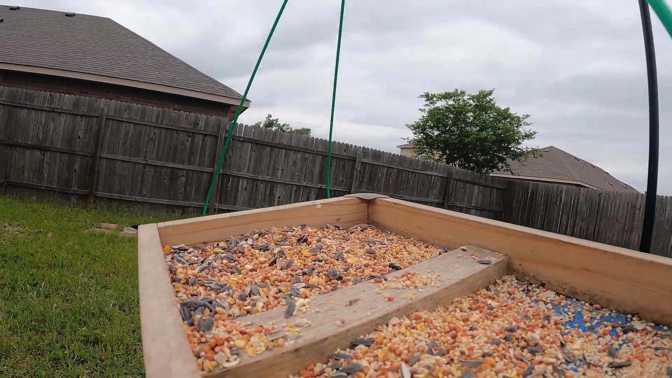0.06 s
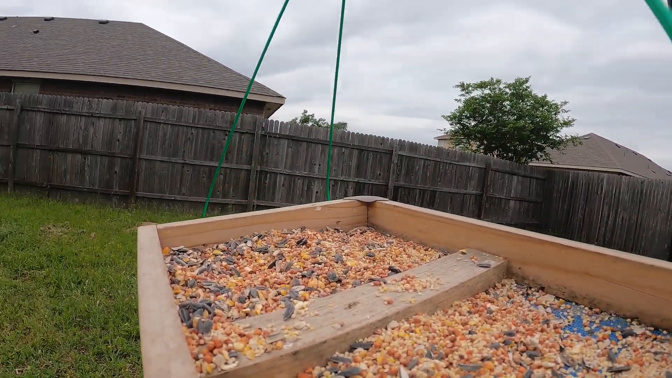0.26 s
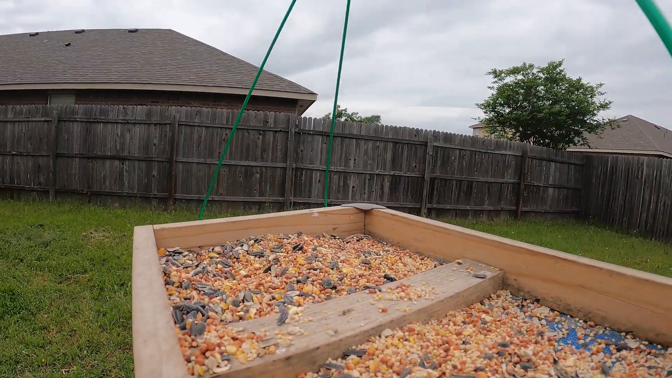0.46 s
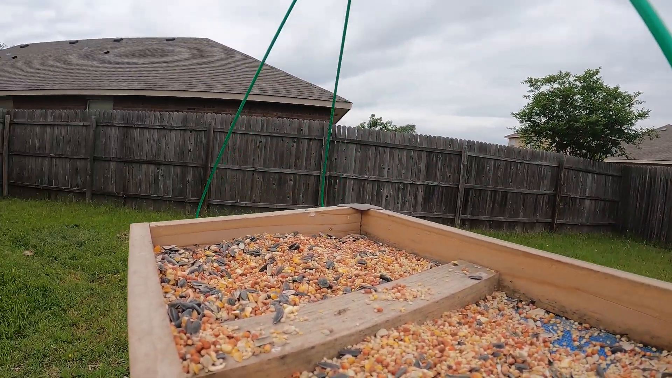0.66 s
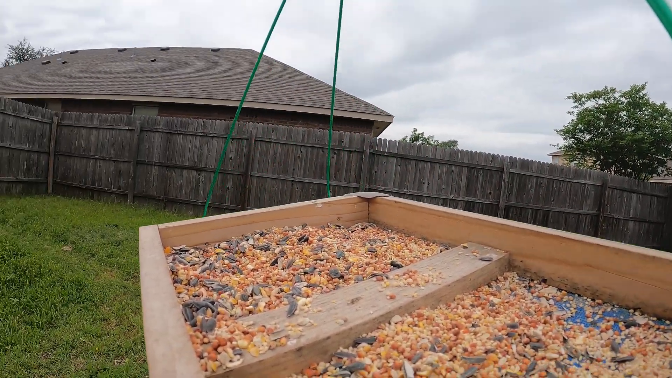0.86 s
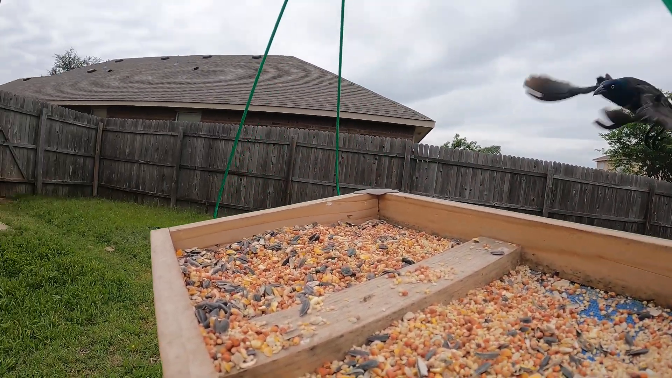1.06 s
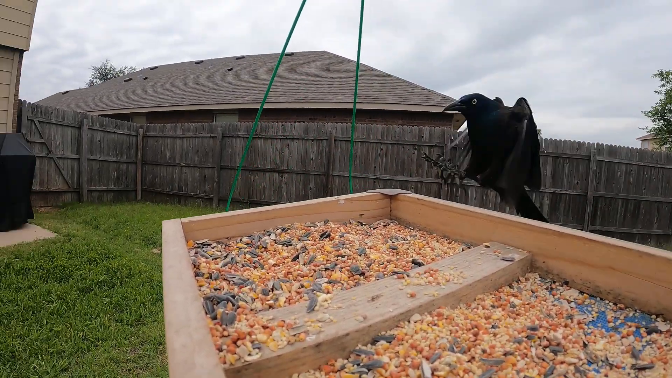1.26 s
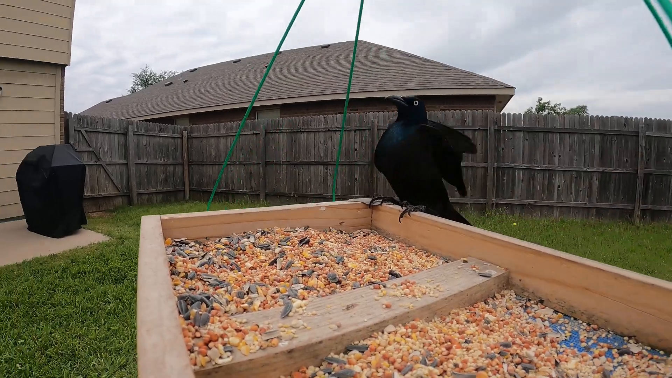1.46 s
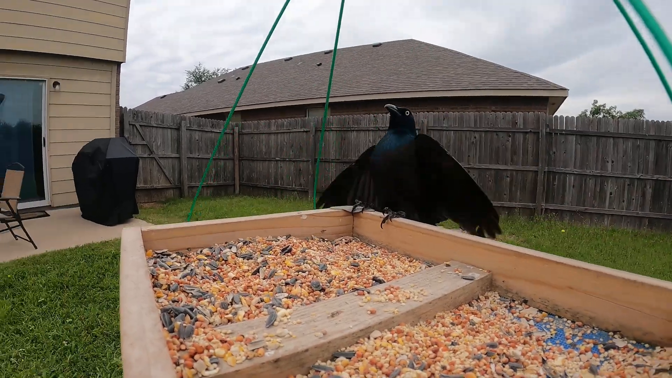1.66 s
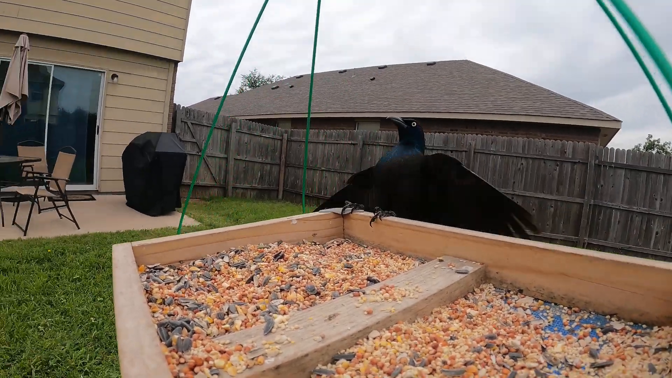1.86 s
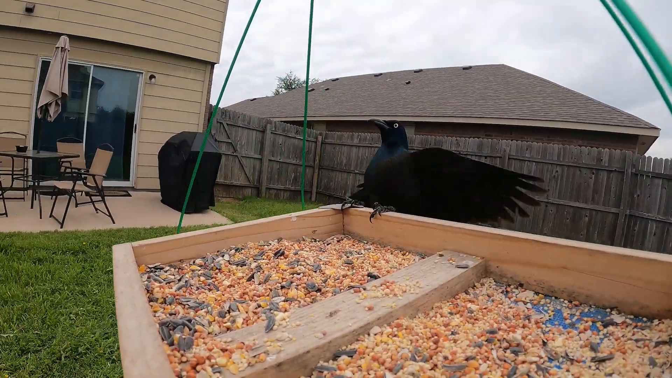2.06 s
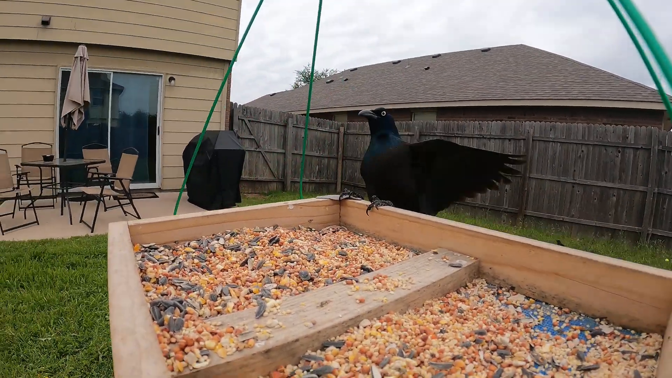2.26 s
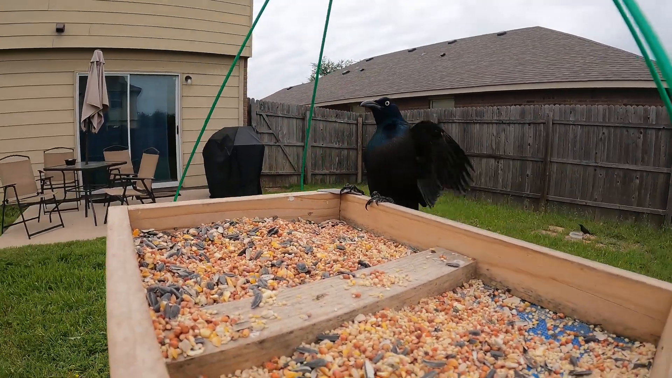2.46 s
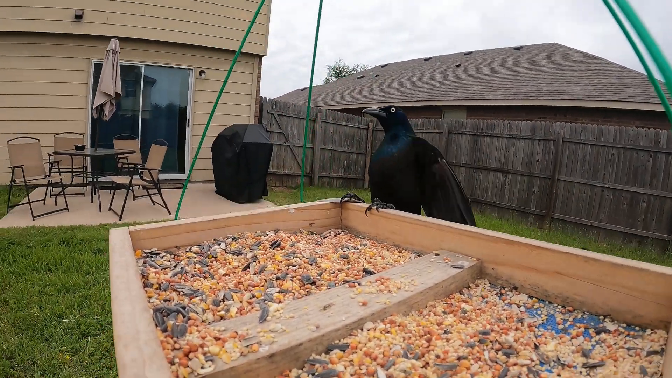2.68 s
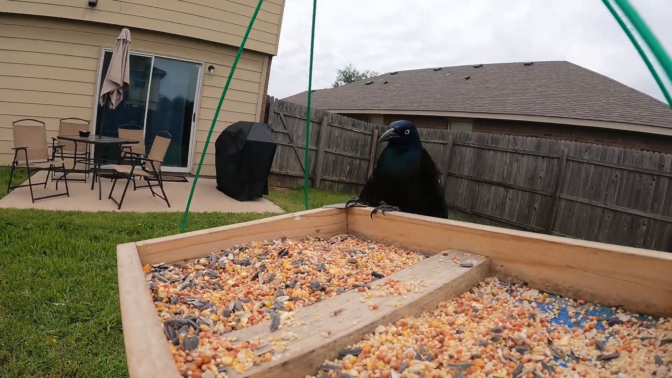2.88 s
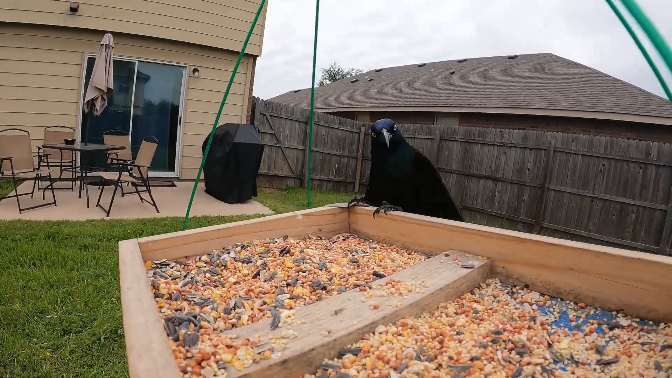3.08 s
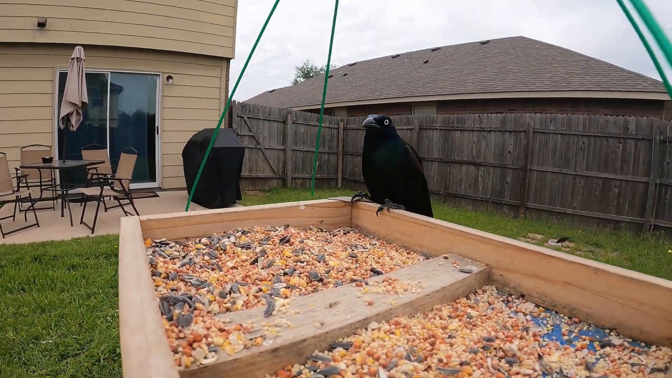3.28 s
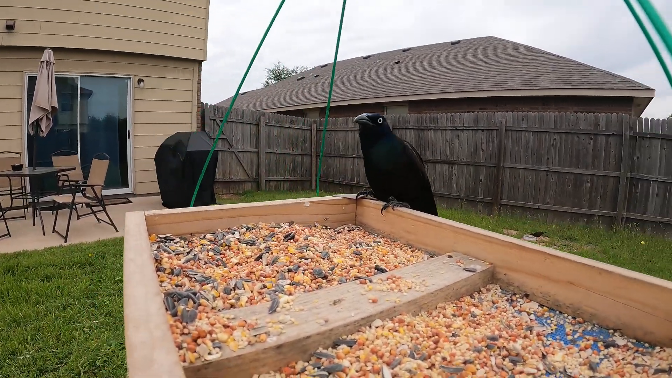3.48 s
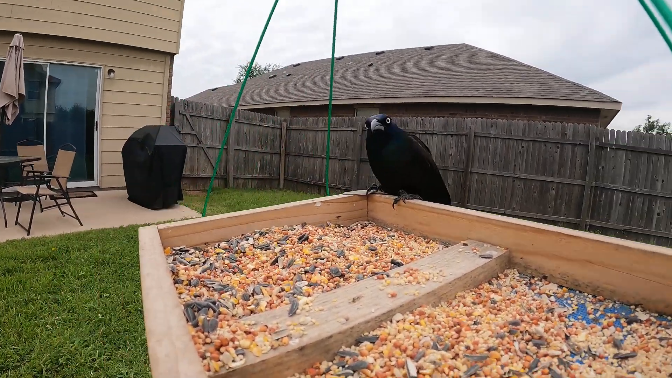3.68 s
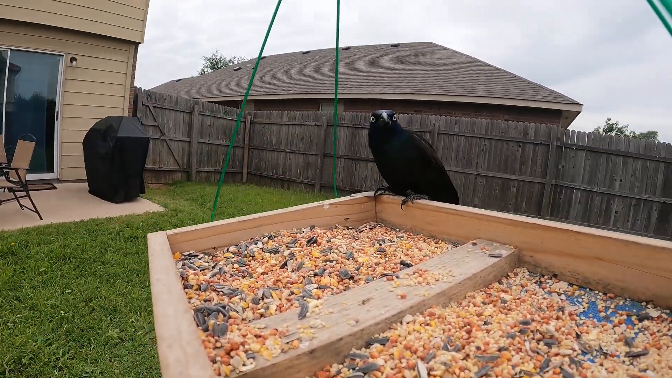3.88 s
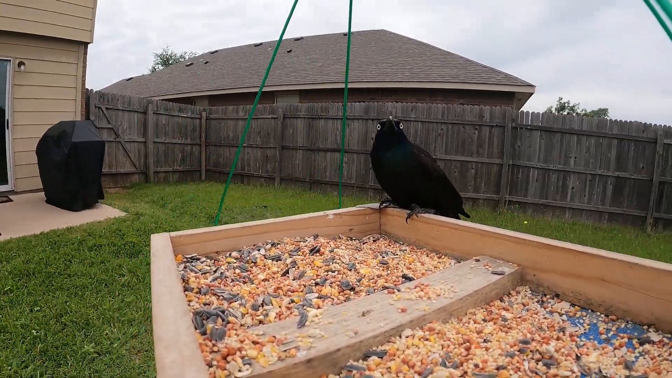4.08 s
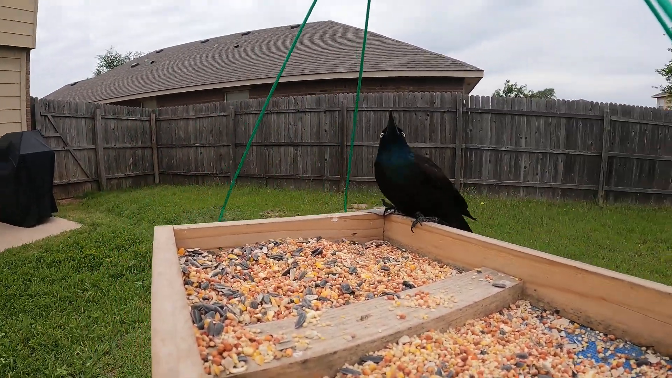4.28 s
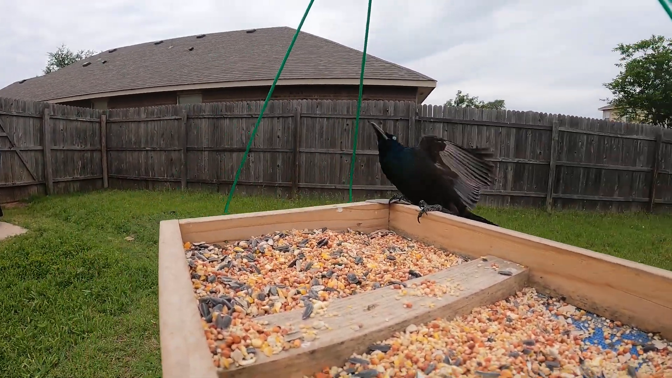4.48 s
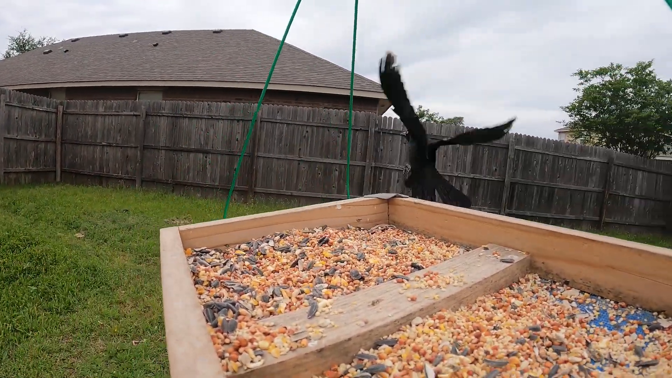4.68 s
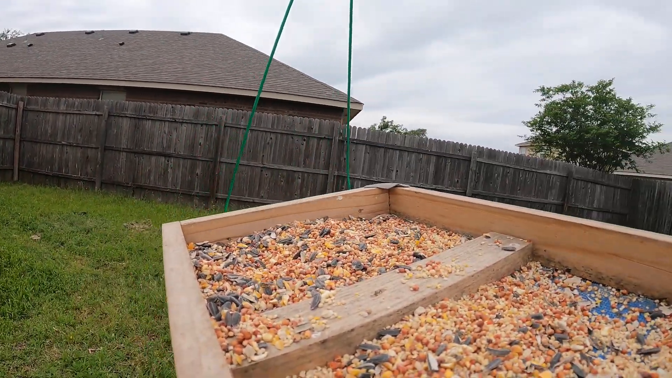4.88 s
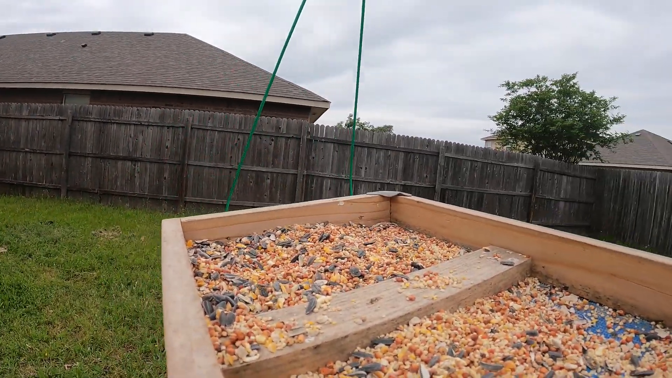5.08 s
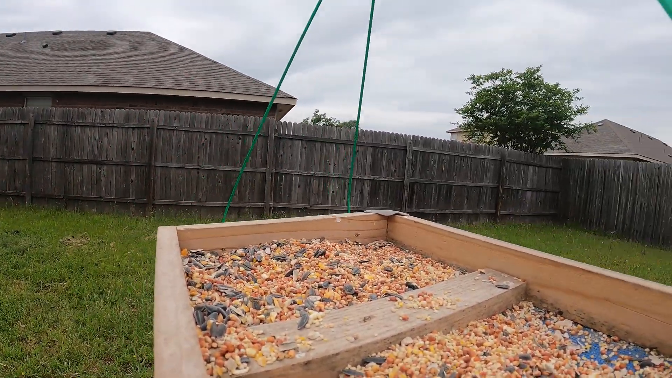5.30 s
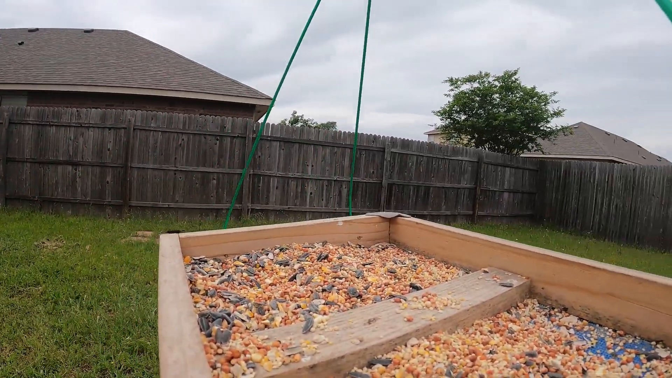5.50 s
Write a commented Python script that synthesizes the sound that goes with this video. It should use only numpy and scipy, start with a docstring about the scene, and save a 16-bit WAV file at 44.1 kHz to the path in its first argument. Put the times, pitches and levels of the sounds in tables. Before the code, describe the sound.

In a suburban yard, a bird flaps in close to a microphone on a wooden seed tray and lands with a sharp clack. Its feathers swish in quick, soft shivers. Then its claws knock and skid as it takes off, the wingbeats buffeting the microphone with low puffs of air. Distant traffic, an engine hum and a few faint songbirds lie behind.

```python
"""A suburban yard, with a stereo microphone on a hanging wooden seed tray. A grackle flies in, lands
with a clack, shivers its wings and takes off again. Close up, its feathers swish as their barbs catch
and slip, its claws knock and skid on the wood, and its downwash buffets the microphone.
Far behind it are the rumble of traffic, the hum of one engine and a few songbirds."""
import sys
import numpy as np
from scipy import signal
from scipy.fft import rfft, irfft, next_fast_len
from scipy.io import wavfile
from scipy.ndimage import uniform_filter1d, map_coordinates

SR = 44100
rng = np.random.default_rng(int(sys.argv[2]) if len(sys.argv) > 2 else 0)


def pcm_store(signal):
    """Save signal as 16-bit PCM."""
    levels = np.round(np.clip(np.atleast_2d(signal), -1, 1) * 32767)
    wavfile.write(sys.argv[1], SR, levels.astype(np.int16).T)


N = 244314

# Noise colours, far to near. Each row: frequency in Hz, relative spectral density in dB.
TRAFFIC_WASH = [(150, -24), (250, -5), (400, -8), (830, -10.5), (1150, -8), (1600, -15.5), (2400, -29),
                (3600, -36), (5800, -32.5), (7400, -36.5), (8600, -44.5), (10200, -35.5), (11000, -47.5),
                (15000, -56.5)]
TRAFFIC_RUMBLE = [(30, -13), (55, -2.5), (110, -1.5), (200, -11), (270, -16.5), (420, -37.5), (900, -71)]
EDDY_SPECTRUM = [(6, -22), (20, 2.5), (45, 2.5), (75, -4.5), (130, -12.5), (300, -42.5)]
PUFF_SPECTRUM = [(20, -12), (50, 3.5), (95, -5), (160, -11.5), (260, -20.5), (450, -39), (1200, -97)]
WHOOSH_SPECTRUM = [(100, -4), (250, 4), (550, 0.5), (900, -5), (1400, -5.5), (2500, -20), (6000, -19.5),
                   (14000, -50)]
FEATHER_HISS = [(1500, -25), (4000, -11), (6500, 0), (8200, -2.5), (10200, -3), (12500, -14), (15000, -26)]
FEATHER_BODY = [(300, -15.5), (700, 5), (1300, 10), (2000, 8.5), (3500, 4), (5500, 1), (8000, -6.5),
                (14000, -39.5)]
THUD_SPECTRUM = [(120, -14), (250, -7), (380, 0.5), (520, -5.5), (800, -35), (2000, -53)]
CLICK_SPECTRUM = [(700, -2), (1620, -15), (1980, 4), (4100, 4.5), (5500, -1), (7200, -2.5), (8500, -15.5),
                  (12000, -25), (15000, -43)]
# Stereo width of the traffic wash. Each row: frequency in Hz, left-right correlation.
WASH_LIKENESS = [(240, 0.47), (950, 0.56), (3800, 0.28), (15000, 0.47)]
# The microphone's two ports. Each row: frequency in Hz, lag of the left in radians.
PORT_LAG = [(200, 0.036), (1200, 0.66), (3500, 1), (8000, 0.36)]

# The distant engine. Each row: time in seconds, crank speed in Hz, relative level in dB.
ENGINE_RUN = [(0, 20.4, -54), (.45, 20.6, -48.5), (1.1, 20.7, -49), (1.85, 21.07, -49.5),
              (2.8, 21.05, -49.5), (3.6, 21.5, -47), (3.87, 21.9, -57), (5.54, 22.6, -62)]
# Its tones. Each row: multiple of the crank speed, relative level in dB.
CRANK_ORDERS = [(5, 4.5), (6, -6), (8, 3.5), (9, -8), (10, -2)]
# Thin partials of a far bird's creak. Each row: pitch in Hz, width in Hz, relative level in dB.
CREAK_PARTIALS = [(1205, 140, -54), (2970, 130, -56.5), (5670, 200, -60), (6750, 280, -67)]
# The creak and its faint repeat. Each row: start and end in seconds, relative level in dB.
CREAKS = [(1.921, 2.343, 0), (2.805, 2.923, -6.5)]
# A far bird's falling chirps. Each entry: start in seconds.
CHIRP_STARTS = [3.014, 3.134, 3.276, 3.386, 3.528, 3.797, 3.911]
# Far whistles and buzzes. Each row: start and end in seconds, first and last pitch in Hz,
# width in Hz, relative starting level in dB, change over the note in dB.
SONG_NOTES = [(4.468, 4.605, 4460, 4370, 30, -54, -4), (4.72, 4.785, 3515, 3495, 20, -53, 4),
              (4.8, 4.97, 3495, 3470, 35, -59, -6), (4.98, 5.2, 3400, 3430, 35, -62, -3),
              (5.18, 5.29, 4150, 4240, 60, -61, 6), (5.3, 5.6, 4210, 4230, 190, -56, -1),
              (5.27, 5.6, 3880, 3800, 120, -61, 0)]

# Light wind on the microphone. Each row: time in seconds, level in dB.
BREEZE_LEVELS = [(0, -46), (.8, -46.5), (3.3, -45), (3.8, -57.5), (4.4, -41), (5.54, -48.5)]
# Downwash hitting the microphone. Each row: time in seconds, relative level in dB.
DOWNWASH = [(1.163, -30.5), (1.214, -29.5), (1.302, -29.5), (1.37, -35), (1.444, -28), (4.553, -33),
            (4.693, -30), (4.715, -30.5), (4.854, -22.5), (4.897, -20), (4.928, -24), (4.981, -21.5),
            (5.088, -27.5)]
# Wing strokes, flying in and away. Each row: time in seconds, relative hiss and whoosh levels in dB.
STROKES = [(0.814, -61.5, -54), (.908, -59, -48.5), (.976, -54, -43.5), (1.057, -56, -38.5),
           (1.149, -50.5, -36.5), (1.229, -51, -33.5), (1.317, -52.5, -37), (1.438, -56.5, -39.5),
           (4.499, -56.5, -47.5), (4.598, -64, -68), (4.645, -53, -36.5), (4.688, -54, -30.5),
           (4.791, -62.5, -49), (4.882, -71.5, -67), (5.078, -69.5, -53), (5.156, -64, -57),
           (5.248, -63, -49), (5.332, -63, -44.5), (5.423, -69, -51)]
# Wing shivers on the tray, about nine a second. Each row: time in seconds, relative hiss level in dB,
# level of the folding swish against the opening one in dB.
SHIVERS = [(1.608, -63.5, -5), (1.646, -57.5, -8.5), (1.737, -60, -3), (1.854, -60.5, 0.5),
           (1.953, -58.5, -5), (2.058, -58.5, -5), (2.168, -57.5, -7.5), (2.275, -59, -3), (2.378, -57, -7),
           (2.498, -57, -9.5), (2.606, -59, -6), (2.741, -56.5, -10.5), (2.85, -56, -11.5),
           (2.952, -58, -11), (3.069, -59, -11.5), (3.183, -62.5, -3.5), (4.429, -64, -6)]
# Snapping quills. Each row: start in seconds, relative hiss and body levels in dB.
QUILL_FLICKS = [(.971, -61, -43), (1.057, -48, -36.5), (1.076, -43, -55), (1.122, -51, -48),
                (1.823, -63, -50), (1.949, -66, -51), (2.129, -63, -44), (2.212, -52.5, -57),
                (2.265, -59, -40.5), (3.172, -55.5, -46.5), (4.604, -58, -37.5), (5.32, -72, -44.5)]
# Claws skidding off the rim. Each row: start in seconds, first and last pitch in Hz, relative level in dB.
SKIDS = [(4.6606, 4900, 3000, -37), (4.6732, 4200, 3900, -37), (4.6786, 3000, 2400, -33.5),
         (4.682, 4100, 4250, -40), (4.695, 2900, 3100, -43)]
# The ring of the boards. Each row: frequency in Hz, relative level in dB, seconds to fall by 60 dB.
TRAY_MODES = [(560, -12, .021), (800, -9, .015), (1010, -7, .019), (1290, 4, .015), (1930, -16, .019),
              (2304, -20, .025), (3200, -19, .014), (3800, -16, .009), (4250, -14, .008)]
# Feet on the tray. Each row: start in seconds, relative knock, thud and click levels in dB,
# upper edge of the click in Hz.
FOOTFALLS = [(1.4053, -22, -33, -13.5, 10000), (1.4112, -33, -20, -24, 16000),
             (1.4236, -33, -42, -27, 6500), (1.503, -43, -46, -39, 7000), (1.668, -62, -43.5, -43.5, 6000),
             (4.4, -38.5, -43, -47, 12000), (4.4405, -47, -50, -45, 6000),
             (4.6226, -23.5, -38, -33.5, 11000), (4.6612, -53, -47, -30.5, 14000),
             (4.6732, -42, -47, -29.5, 9000), (4.6808, -28, -37, -29, 3200),
             (4.764, -43, -49, -33.5, 14000), (4.811, -44.5, -56, -47, 5000)]


def amp(db):
    """Decibels to gain."""
    return 10 ** (np.asarray(db) / 20)


def unit(x):
    """Scaled to rms 1."""
    return x / np.sqrt(np.mean(x ** 2) + 1e-20)


def clock():
    """The time of every sample, in seconds."""
    return np.arange(N) / SR


def along(points, hz):
    """Reads between (Hz, value) points on a log frequency axis."""
    knots_hz, values = np.transpose(points)
    return np.interp(np.log(hz + 1), np.log(knots_hz + 1), values)


def curves(rows):
    """One value per sample for each column after the time."""
    times, *columns = np.transpose(rows)
    return [np.interp(clock(), times, column) for column in columns]


def wobble(rate):
    """A smooth random curve, rate knots a second."""
    return map_coordinates(rng.standard_normal(int(N * rate / SR) + 4), [np.arange(N) * rate / SR])


def filtered(x, response):
    """x through a response given as a function of Hz."""
    size = next_fast_len(x.shape[-1] + SR // 4)
    return irfft(rfft(x, size) * response(np.fft.rfftfreq(size, 1 / SR)), size)[..., :x.shape[-1]]


def coloured(x, spectrum):
    """x shaped by a spectrum and rolled off above its last point, at rms 1."""
    top_hz = spectrum[-1][0]
    return unit(filtered(x, lambda hz: amp(along(spectrum, hz)) / np.hypot(1, (hz / top_hz) ** 10)))


def white_pair(side_db):
    """White noise that left and right mostly share."""
    mid, side = rng.standard_normal((2, N))
    return unit(np.array([mid + amp(side_db) * side, mid - amp(side_db) * side]))


def band(hz, width_hz):
    """A band of noise at rms 1."""
    return unit(filtered(rng.standard_normal(N), lambda f: 1 / (1 + ((f - hz) / (0.85 * width_hz)) ** 4)))


def pan(db):
    """Left and right gains for a level difference; negative leans right."""
    return amp(np.array([db, -db]).reshape(2, -1) / 2)


def swells(times, levels_db, rise, fall):
    """The envelope of a row of rounded swells, rising and falling in the given seconds."""
    t = clock()
    each = (amp(db) / (1 + ((t - s) / np.where(t < s, rise, fall)) ** 2) for s, db in zip(times, levels_db))
    return np.sqrt(sum(swell ** 2 for swell in each))


def gate(start, end, edge):
    """Fades in from start and out from end, over edge seconds."""
    return np.clip((clock() - start) / edge, 0, 1) * np.clip((end - clock()) / edge + 1, 0, 1)


def progress(start, length):
    """Climbs from 0 to 1 over length seconds."""
    return np.clip((clock() - start) / length, 0, 1)


def phase_of(hz):
    """The running phase of a changing pitch."""
    return 2 * np.pi * np.cumsum(hz) / SR


def echoes(x, t60):
    """A diffuse stereo tail from fences and walls."""
    t = np.arange(SR // 2) / SR
    tail = rng.standard_normal((2, len(t))) * amp(-60 * t / t60)
    return signal.fftconvolve(np.atleast_2d(x), tail / np.linalg.norm(tail[0]), axes=1)[:, :N]


def ports(x):
    """The two microphone ports hear the birds slightly out of step."""
    return filtered(x, lambda hz: np.exp(.5j * along(PORT_LAG, hz) * np.array([[-1], [1]])))


def traffic():
    """Far traffic: a rumble under a soft, wide wash."""
    def mid_side_gains(hz):
        angle = np.arccos(np.clip(along(WASH_LIKENESS, hz), -1, 1)) / 2
        return np.array([np.cos(angle), np.sin(angle)])
    mid, side = filtered(rng.standard_normal((2, N)), mid_side_gains)
    wash = amp(-57.5 + 0.24 * wobble(4.0)) * coloured(np.array([mid + side, mid - side]), TRAFFIC_WASH)
    rumble = amp(-48.5 + 0.74 * wobble(4.2)) * coloured(white_pair(side_db=-13.5), TRAFFIC_RUMBLE)
    return wash + rumble


def engine(flicker_db=1.5, jitter_rad=.15):
    """A distant engine drones on multiples of its crank speed, creeps faster and then fades."""
    speed_hz, level_db = curves(ENGINE_RUN)
    crank = phase_of(speed_hz)
    drone = np.zeros(N)
    for order, db in CRANK_ORDERS:
        gain = amp(db + flicker_db * wobble(3))
        drone += gain * np.sin(order * crank + jitter_rad * wobble(8) + 2 * np.pi * rng.random())
    return amp(level_db) * drone


def bird_tone(hz, width_hz, hoarse_width_hz=37):
    """A held tone of rms 1; a fast, deep flutter widens it from a whistle into a rasping buzz."""
    rough = min(width_hz / hoarse_width_hz, 1) ** 2
    tone = np.sin(phase_of(hz * np.ones(N)) + (.4 + rough) * wobble(2 * width_hz))
    return unit(tone * amp((1 + 3 * rough) * wobble(1.5 * width_hz)))


def chirp(start, top_hz, db, hoarse):
    """One short note that holds its top for a moment, then hooks down and fades."""
    u = progress(start, length=.033)
    phase = phase_of(top_hz * (1 - .17 * u ** 2)) + hoarse * wobble(600)
    return amp(db) * np.sin(np.pi * u ** .7) * np.sin(phase)


def creaking_call(fade_db_per_s=12):
    """A far bird creaks twice: thin partials over a broad rasp, weakening as each call goes on."""
    partials = sum(amp(db) * bird_tone(hz, width_hz) for hz, width_hz, db in CREAK_PARTIALS)
    envelope = sum(amp(db - fade_db_per_s * np.abs(clock() - start)) * gate(start, end, edge=0.021)
                   for start, end, db in CREAKS)
    return envelope * (partials + amp(-55) * band(1900, width_hz=2800))


def songbirds():
    """Far birds and their echoes: creaks, chirps and twitter, then whistles that end in a buzz."""
    song = creaking_call()
    # each chirp is a little louder than the last
    song += sum(chirp(s, top_hz=4370, db=-68 + 0.5 * k, hoarse=.3) for k, s in enumerate(CHIRP_STARTS))
    song += chirp(3.662, top_hz=3240, db=-55, hoarse=3.1)  # another bird's single chip
    twitter = sum(unit(band(hz, width_hz=420) * amp(3.5 * wobble(70))) for hz in (2750, 5000))
    song += amp(-76.5) * gate(3.68, 4.32, edge=.04) * twitter
    for start, end, start_hz, end_hz, width_hz, db, change_db in SONG_NOTES:
        u = progress(start, end - start)
        envelope = gate(start, end, edge=width_hz / 3000)  # whistles start at once, buzzes swell
        song += amp(db + change_db * u) * envelope * bird_tone(start_hz + (end_hz - start_hz) * u, width_hz)
    return amp(-4.5) * song + amp(-13) * echoes(song, t60=0.36)


def swishes(lag_s=0.016, recovery_s=0.045, recovery_db=-5, fold_s=0.036, turn_away_s=4.58):
    """A wing swishes as it opens and, duller, as it closes: times, hiss dB, body dB."""
    # in flight the swish lags the push of air and has more body, 6 dB more again from behind
    flying = [(s + lag_s, db, 0.5 + 6 * (s >= turn_away_s), recovery_s, recovery_db) for s, db, _ in STROKES]
    perched = [(s, db, 0, fold_s, fold_db) for s, db, fold_db in SHIVERS]
    opens, db, extra_body_db, close_delay, close_db = np.transpose(flying + perched)
    hiss_db = np.r_[db, db + close_db]
    body_db = hiss_db + np.r_[extra_body_db + 0.83, extra_body_db + 1.5]
    return np.r_[opens, opens + close_delay], hiss_db, body_db


def draught(linger_s=0.15, growth=1.298):
    """Breeze on the microphone, and eddies that grow with wing effort and linger around the tray."""
    times, hiss_db, _ = swishes()
    decay = np.exp(-1 / (linger_s * SR))
    effort = signal.lfilter([1 - decay], [1, -decay], swells(times, hiss_db, rise=0.016, fall=0.016))
    stirred = amp(42) * effort ** growth * pan(-1.7)
    breeze = amp(curves(BREEZE_LEVELS)[0])
    return np.hypot(breeze, stirred) * coloured(white_pair(side_db=-18.5), EDDY_SPECTRUM)


def downwash(half_length_s=0.0061):
    """Vortices pass right over the microphone: each a pressure dip between two smaller rises, in churn."""
    envelope = swells(*np.transpose(DOWNWASH), rise=.011, fall=.011)
    pressure = amp(-0.5) * envelope * coloured(white_pair(side_db=-9), PUFF_SPECTRUM)
    for s, db in DOWNWASH:
        spread = ((clock() - s) / half_length_s) ** 2
        pressure += amp(db + 6) * (spread - 1) * np.exp(-spread / 2)
    return pressure * pan(-4.0)


def wing_whoosh(ruffle_db=3, ruffles_per_s=330):
    """Each stroke pushes a whoosh of air, ruffled by loose feathers."""
    times, _, whoosh_db = np.transpose(STROKES)
    envelope = amp(1.0) * swells(times, whoosh_db, rise=0.0095, fall=0.0081)
    air = amp(ruffle_db * wobble(ruffles_per_s)) * white_pair(side_db=-19.5)
    return envelope * coloured(air, WHOOSH_SPECTRUM) * pan(-2.7)


def wing_whistle(top_hz=8100, end_hz=2400, brake_s=1.17):
    """Air whistles through the parted flight feathers, falling in pitch as the wing slows."""
    out = np.zeros(N)
    in_phase, quadrature = wobble(3600), wobble(3600)
    for s, hiss_db, _ in STROKES:
        u = progress(s, length=.052)
        phase = phase_of(top_hz + (end_hz - top_hz) * u)
        breathy_tone = in_phase * np.sin(phase) + quadrature * np.cos(phase)
        flare_db = 12 * np.exp(-((s - brake_s) / .07) ** 2)  # feathers spread to brake whistle louder
        out += amp(hiss_db - 7 + flare_db) * np.sin(np.pi * u) * breathy_tone
    return out * pan(-1.9)


def quill_flicks(rise_s=0.0026, t60=0.034):
    """Stiff quills snap past each other: sudden envelopes for hiss and body."""
    hiss, body = np.zeros((2, N))
    for s, hiss_db, body_db in QUILL_FLICKS:
        t = np.maximum(clock() - s, 0)
        snap = (1 - np.exp(-t / rise_s)) * amp(-60 * t / t60)
        hiss += amp(hiss_db) * snap
        body += amp(body_db) * snap
    return hiss, body


def feathers():
    """Close up, barbs catch and slip as feathers fan and fold: grainy swishes, soft rustle, crisp flicks."""
    times, hiss_db, body_db = swishes()
    grain = amp(1.8 * wobble(900) + 2 * wobble(130))
    swish_hiss = amp(-0.3) * swells(times, hiss_db, rise=0.013, fall=0.014)
    swish_body = swells(times, body_db, rise=0.01, fall=0.027)
    rustle = amp(-8.5) * np.abs(uniform_filter1d(swish_body, size=SR // 5))
    flick_hiss, flick_body = quill_flicks()
    hiss_level = np.hypot(swish_hiss, amp(3.5) * flick_hiss)
    body_level = amp(2.5) * np.sqrt(swish_body ** 2 + rustle ** 2 + flick_body ** 2)
    hiss = hiss_level * coloured(grain * white_pair(side_db=-20.5), FEATHER_HISS)
    body = body_level * coloured(grain * white_pair(side_db=-18.0), FEATHER_BODY)
    return hiss * pan(-.6) + body * pan(-1.2)


def claw_skids(slips_per_s=1600):
    """A skidding claw sticks and slips on the grain: very short, rough squeaks."""
    out = np.zeros(N)
    jitter = .75 * wobble(slips_per_s)
    grain = amp(2 * wobble(slips_per_s))
    for s, start_hz, end_hz, db in SKIDS:
        u = progress(s, length=.0055)
        phase = phase_of(start_hz + (end_hz - start_hz) * u)
        out += amp(db) * np.sqrt(np.abs(np.sin(np.pi * u))) * np.sin(phase + jitter)
    return grain * out


def claw_knocks(floor_hz=360, floor_t60=.045):
    """Right by the microphone, each footfall clicks, rings the boards and thuds in the hollow floor."""
    out = np.zeros((2, N + SR))
    t = np.arange(SR // 5) / SR
    grip = 1 - np.exp(-t / 0.00034)  # a claw takes a moment to bite
    for s, knock_db, thud_db, click_db, edge_hz in FOOTFALLS:
        ring = np.zeros((2, len(t)))
        for hz, db, t60 in TRAY_MODES:
            envelope = amp(db + rng.normal(0, 3.1) - 60 * t / t60)
            port_phase = rng.normal(0, 0.74, (2, 1))  # the boards shake the two ports out of step
            ring += envelope * np.sin(2 * np.pi * hz * t + port_phase)
        noise = rng.standard_normal(len(t)) + 0.28 * rng.standard_normal((2, len(t)))
        scratch = filtered(coloured(noise, CLICK_SPECTRUM), lambda hz: 1 / np.hypot(1, (hz / edge_hz) ** 2))
        click = scratch * (amp(-60 * t / 0.0087) + amp(-24 - 60 * t / 0.06))
        floor = 1.6 * np.sin(2 * np.pi * floor_hz * t) + coloured(rng.standard_normal(len(t)), THUD_SPECTRUM)
        thud = floor * amp(-60 * t / floor_t60)
        hit = (amp(knock_db + 2) * ring * pan(-8.5)
               + amp(click_db + 4.5) * click * pan(-1.7)
               + amp(thud_db - 6.5) * thud * pan(-13.0))
        start = round(s * SR)
        out[:, start:start + len(t)] += grip * hit
    return out[:, :N]


def scene():
    """The grackle at the microphone, with the neighbourhood far behind."""
    tray = claw_knocks() + claw_skids() + claw_skids()  # two layers of skid, each with its own grain
    wings = feathers() + wing_whistle() + wing_whoosh() + downwash() + draught()
    birds = wings + tray + amp(-22.5) * echoes(tray, t60=0.11) + songbirds()
    return ports(birds) + engine() + traffic()


def record(dry, top_hz=15700):
    """The recorder keeps nothing above its band limit."""
    return filtered(dry, lambda hz: hz < top_hz)


dry = scene()
out = record(dry)
pcm_store(out)
```